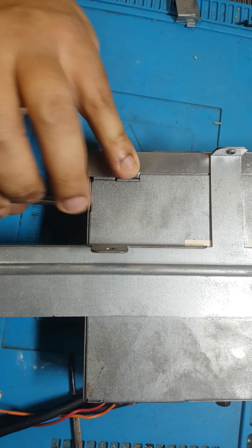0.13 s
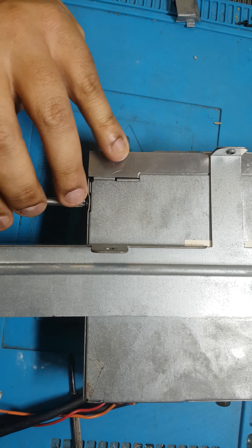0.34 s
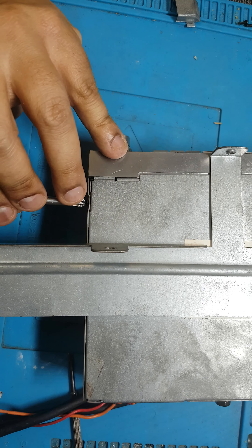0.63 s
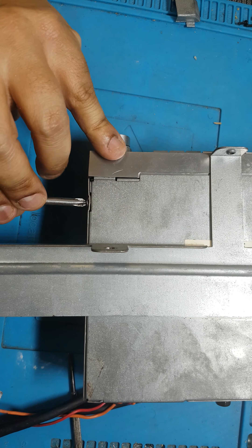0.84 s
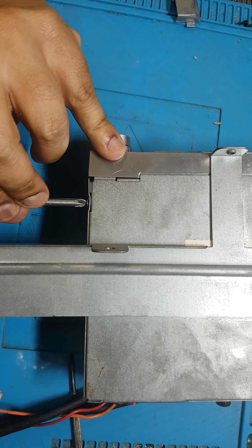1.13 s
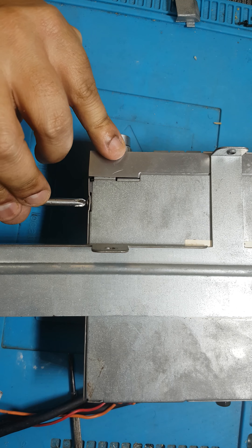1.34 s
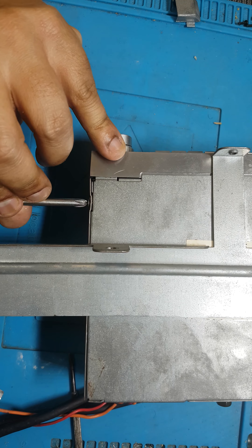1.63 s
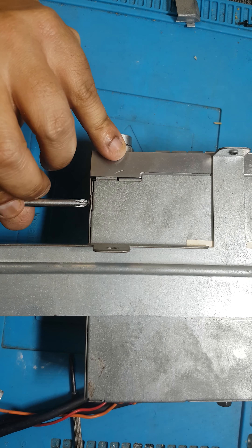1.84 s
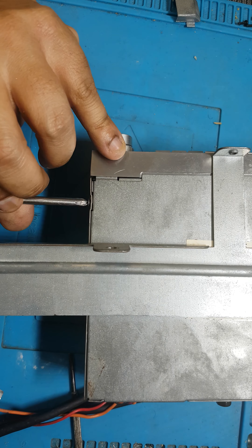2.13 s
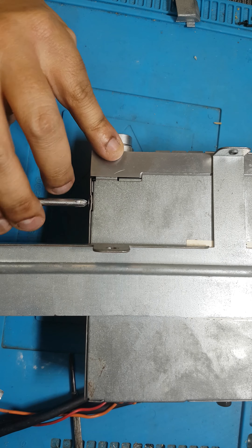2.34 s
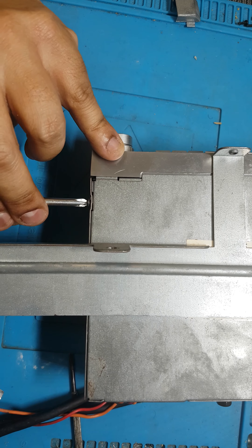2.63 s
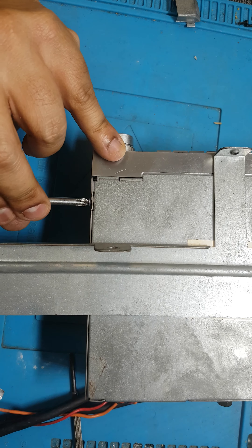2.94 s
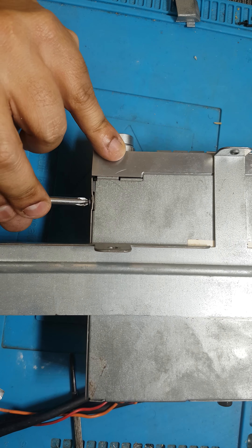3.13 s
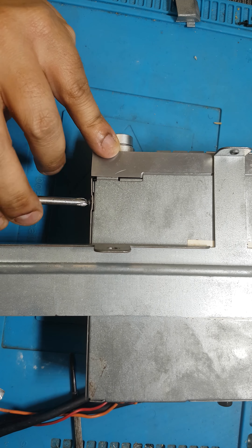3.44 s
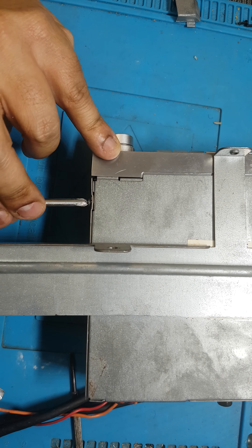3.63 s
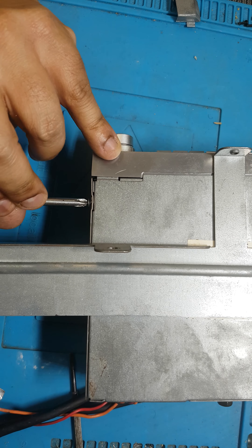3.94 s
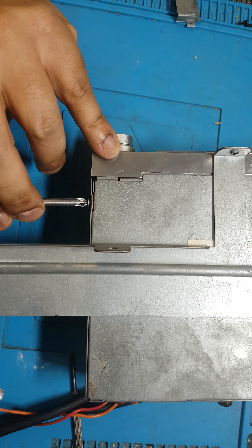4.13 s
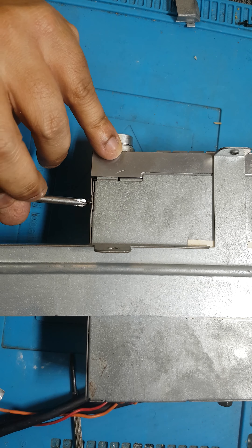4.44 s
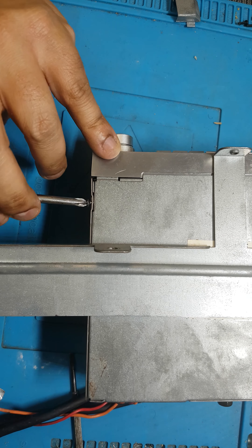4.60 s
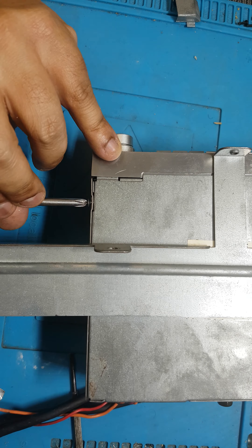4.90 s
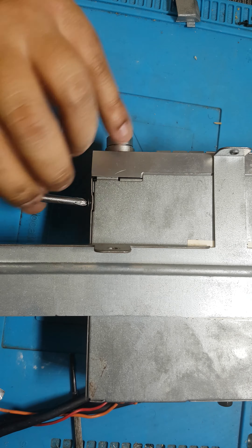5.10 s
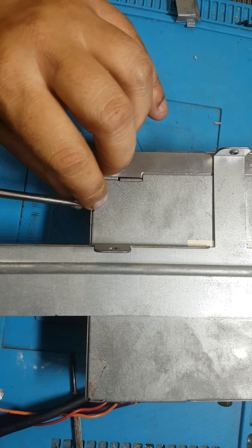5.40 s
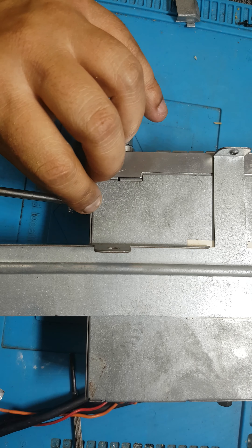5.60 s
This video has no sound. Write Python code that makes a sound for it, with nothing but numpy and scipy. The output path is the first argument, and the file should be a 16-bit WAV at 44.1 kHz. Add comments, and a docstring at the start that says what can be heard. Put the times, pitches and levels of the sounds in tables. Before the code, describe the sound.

A small screwdriver pries at a thin steel casing: faint taps and clicks, then hollow metallic pops that crack loudly in quick bursts, in a quiet room.

```python
"""A quiet workroom: a small screwdriver pries at a thin steel casing on a bench, close to a phone.
Slips of the tip crack through the sheet (shaped noise plus modes) and pop the lid (swelling low modes).
Taps and edge clicks are weaker contacts; scrapes and brief shaft knocks are noise grains ringing the shaft.
Squeaks and steel rings are sums of swelling, decaying modes.
A short room tail follows, over a faint hum, low rumble and hiss (shaped noise)."""
import sys
import numpy as np
from scipy import signal
from scipy.fft import rfft, irfft
from scipy.io import wavfile
from scipy.ndimage import uniform_filter1d

SR = 44100
rng = np.random.default_rng(int(sys.argv[2]) if len(sys.argv) > 2 else 0)


def persist_wave(psi):
    """Save psi, clipped to +-1, as 16-bit WAV."""
    counts = np.round(np.clip(psi, -1, 1) * 32767).astype(np.int16)
    wavfile.write(sys.argv[1], SR, np.atleast_2d(counts).T)


N = 254016
RING_S = np.arange(SR // 3) / SR  # time axis of one ring

# Mode and colour levels are relative. Contact levels precede the trims in contact().
# room noise spectrum: freq_hz, density_db
ROOM_COLOUR = [(15, -33), (25, -3), (43, -5), (134, -4.5), (263, -5), (394, -14), (575, -16), (677, -18),
               (1070, -25.5), (1290, -26), (1480, -29.5), (2550, -33), (8140, -46), (14400, -41),
               (16000, -37)]
# room noise over time, before the trims in background(): time_s, rumble_db, hiss_db
ROOM_LEVEL = [(0.0, -58, -65.5), (0.19, -60, -69.5), (2.04, -57, -68.5), (2.57, -61, -69.5),
              (2.98, -58.5, -69), (3.35, -60, -70.5), (3.77, -54.5, -67), (5.18, -64.5, -70),
              (5.45, -56.5, -65.5), (5.76, -63, -70.5)]
# hum of a running appliance: centre_hz, width_hz, level_db
HUM = [(48.7, 5, -67.5), (87, 8, -74), (170.8, 28, -72.5), (266, 43, -65.5), (1266, 90, -90.5)]
# tip drags on the edge, or briefly knocks the shaft: start_s, length_s, level_db
SCRAPES = [(0.0, 0.058, -74), (1.964, 0.036, -65.5), (2.059, 0.013, -59), (4.356, 0.011, -55),
           (4.366, 0.021, -59.5), (5.427, 0.028, -67)]
# hand-damped screwdriver shaft: freq_hz, level_db, t60_s
SHAFT_MODES = [(1610, 2, 0.0085), (2040, 7, 0.0095), (2880, 4, 0.011), (3460, -1, 0.028), (3780, 3, 0.0086),
               (5120, -13, 0.027), (6320, -6, 0.019), (6900, -7, 0.012), (11600, -14, 0.0071)]
# steel rings from taps and contacts, one mode per row, rows may sound together:
# start_s, freq_hz, level_db, t60_s
STEEL_RINGS = [(0.0, 2003, -53.5, 0.13), (1.6532, 3430, -34.5, 0.028), (1.6532, 3680, -32, 0.024),
               (2.064, 1950, -41, 0.054), (3.653, 2870, -29, 0.04)]
STEEL_RING_RISE_S = 0.001
# tip clicks on the hard edge: start_s, tick_db
CLICKS = [(0.098, -65.5), (0.1185, -65), (1.6529, -42), (4.068, -72), (5.437, -53), (5.455, -59),
          (5.592, -61), (5.61, -69)]
CLICK_PITCH_HZ, CLICK_TILT_DB_PER_OCT = 684, 1.5
CLICK_FIRM_DB = -40  # a click this firm shakes the sheet as much as the edge
CLICK_BODY_SLOPE = 0.6  # dB of body share lost per dB softer
# tip touches the lid, feeling for a grip: start_s, knock_db, start_pitch_hz, crack_db
TAPS = [(0.1206, -44.5, 667, -53), (0.8355, -50.5, 706, -75), (1.0727, -29, 760, -58),
        (1.853, -39.5, 590, -80), (2.061, -44, 646, -55), (2.236, -48, 544, -62.5), (3.045, -41, 620, -51),
        (3.066, -48.5, 600, -80), (3.398, -51, 655, -62), (3.486, -40.5, 690, -60.5),
        (3.598, -41.5, 630, -52.5), (3.754, -52, 630, -74), (3.835, -40, 587, -49),
        (4.164, -48.5, 606, -66), (4.302, -31, 615, -42.5), (4.358, -56, 670, -60.5),
        (4.646, -49.5, 516, -60), (4.838, -43, 567, -45.5), (5.298, -56, 657, -62), (5.507, -51, 710, -63)]
TAP_TICK_DB, TAP_TILT_DB_PER_OCT = -22.5, -2.5  # tick relative to crack
# tip slips, lid pops, then springs back: start_s, knock_db, start_pitch_hz, crack_db, rebound_crack_db
POPS = [(1.052, -25.5, 682, -31.5, -43), (1.0665, -21.5, 624, -51, -69), (3.6335, -10, 609, -32.5, -37),
        (4.229, -7, 593, -31, -33), (4.2706, -9.5, 585, -31.5, -42), (4.7519, -14.5, 613, -39.5, -42.5),
        (4.7955, -7.5, 615, -31.5, -43.5), (4.8457, -28, 550, -40.5, -57.5)]
POP_TICK_DB, POP_TILT_DB_PER_OCT = -10.5, -1  # tick relative to crack
REBOUND_DELAY_S, REBOUND_PITCH_RATIO = 0.0187, 0.95
REBOUND_KNOCK_DB, REBOUND_TICK_DB = 12, -12.5  # relative to the rebound crack
REBOUND_TILT_DB_PER_OCT = -1
# tip squeaks as it is twisted: start_s, level_db
SQUEAKS = [(2.17, -67), (2.27, -64), (2.415, -60)]
SQUEAK_HZ, SQUEAK_RISE_S, SQUEAK_T60_S = 4520, 0.0091, 0.097
# lid and the box under it, before pressing: freq_hz, level_db, t60_s
LID_MODES = [(80, -44.5, .15), (129, -38, 0.21), (155, -34, 0.13), (265.2, -28.5, 0.12),
             (439.6, -17, 0.057), (501, -14.5, 0.024), (589.5, 4.5, 0.045), (711.3, -13, 0.067),
             (800, -22, 0.044), (898, -21, 0.053), (1058, -25.5, 0.052)]
LID_HZ = 600  # pitch at which the lid modes are unshifted
# lasting rings of the steel sheet, before tilt and scatter: freq_hz, level_db, t60_s
SHEET_MODES = [(1268, -5.5, 0.074), (1410, -2, 0.026), (1480, -0.5, 0.041), (1664, -5, 0.044),
               (1730, 1.5, 0.079), (2720, -9, 0.073), (2800, -2, 0.067), (2875, -5.5, 0.076),
               (2916, -2, 0.058), (3020, -13, 0.041), (3380, 0.5, 0.045), (3695, -6.5, .05),
               (4256, -15.5, 0.043), (4510, -10.5, 0.056)]
# the sheet's crowd of short modes, before tilt: freq_hz, level_db
CRACK_COLOUR = [(80, -15), (300, -0.5), (600, 1), (900, 10), (1200, -6.5), (1650, 2), (2300, -8.5),
                (2900, -2.5), (3600, -5), (4700, -7), (5400, -14.5), (8000, -16.5), (16000, -65)]
# tick of the hard edge: freq_hz, level_db
TICK_COLOUR = [(2500, 3.5), (5000, 2), (6200, -0.5), (7300, 8), (8900, -1.5), (10500, 2), (13000, 1),
               (16000, 0)]
# reflections from bench and walls: freq_hz, level_db
TAIL_COLOUR = [(100, 4.5), (600, -4.5), (3000, -2.5), (16000, -5)]
TAIL_WET_DB, TAIL_T60_S, TAIL_RISE_S = -23.5, 0.13, 0.011
PORT_LAG_SAMPLES = 3
TOP_HZ = 15800


def undb(db):
    """Decibels to gain."""
    return 10 ** (np.asarray(db) / 20)


def unit(x):
    """Scale to rms 1."""
    return x / np.sqrt(np.mean(x ** 2))


def fade(t60_s):
    """Free decay, 60 dB down after t60_s."""
    return np.exp(-np.log(1000) * RING_S / t60_s)


def swell(rise_s):
    """Vibration takes a moment to spread over the metal."""
    return 1 - np.exp(-(RING_S / rise_s) ** 2)


def pan(left_db):
    """Gains of the two channels for a left-minus-right level."""
    return undb(np.array([[left_db], [-left_db]]) / 2)


def add(out, start_s, sound):
    """Mix a sound in at start_s, cut at the end of the scene."""
    i = int(start_s * SR)
    part = sound[..., :N - i]
    out[..., i:i + part.shape[-1]] += part


def noise(colour, size, alike, tilt_db_per_oct=0):
    """Shaped stereo noise, tilted in the mids; alike(f) is the power share common to both channels."""
    hz, db = np.transpose(colour)
    f = np.maximum(np.fft.rfftfreq(size, 1 / SR), 1)
    tilt_db = tilt_db_per_oct * np.log2(np.clip(f, 700, 4500))
    gain = undb(np.interp(np.log(f), np.log(hz), db) + tilt_db)
    share = alike(f)
    white = rfft(rng.standard_normal((3, size)))
    both = np.sqrt(share) * white[0] + np.sqrt(1 - share) * white[1:]
    return unit(irfft(both * gain, size))


def background():
    """Low rumble mostly alike in both channels, a wide hiss above it, and a wavering hum of narrow noise."""
    time_s, rumble_db, hiss_db = np.transpose(ROOM_LEVEL)
    t = np.arange(N) / SR
    air = noise(ROOM_COLOUR, N, lambda f: 0.028 + 0.76 / (1 + (f / 1800) ** 2))
    low = signal.sosfiltfilt(signal.butter(2, 600, fs=SR, output="sos"), air)
    rumble = unit(low) * undb(np.interp(t, time_s, rumble_db) - 1.7)
    hiss = unit(air - low) * undb(np.interp(t, time_s, hiss_db) + 2.5)
    out = rumble + hiss
    f = np.fft.rfftfreq(N, 1 / SR)
    for hz, width_hz, db in HUM:
        resonance = 1 / (1 + (2 * (f - hz) / width_hz) ** 2)
        out = out + undb(db) * unit(irfft(rfft(rng.standard_normal(N)) * resonance, N))
    return out


def scrapes():
    """Uneven noise grains ring the shaft as the tip drags on the edge or briefly knocks the shaft."""
    catches = np.zeros((2, N))
    size = len(RING_S)
    for start_s, length_s, db in SCRAPES:
        catch_sizes = undb(3 * rng.exponential(size=size))
        grains = unit(rng.standard_normal((2, size)) * catch_sizes)
        add(catches, start_s, undb(db) * grains * np.exp(-(RING_S / length_s) ** 4))
    shaft = sum(undb(db) * np.cos(2 * np.pi * hz * RING_S) * fade(t60_s) for hz, db, t60_s in SHAFT_MODES)
    return signal.fftconvolve(catches, shaft[None] / np.linalg.norm(shaft), axes=1)[:, :N]


def sing(hz, rise_s, t60_s):
    """One mode of the steel swells and dies away."""
    return np.sin(2 * np.pi * hz * RING_S) * swell(rise_s) * fade(t60_s)


def steel_rings():
    """Steel rings from taps and contacts, one mode per row; rows may sound together."""
    out = np.zeros(N)
    for start_s, hz, db, t60_s in STEEL_RINGS:
        add(out, start_s, undb(db) * sing(hz, STEEL_RING_RISE_S, t60_s))
    return out


def knock(start_pitch_hz, rise_s, echo_s, echo_db, grip):
    """The lid's low modes swell within a few cycles; a nearby surface throws them back."""
    press = start_pitch_hz / LID_HZ - 1
    pressing = np.exp(-RING_S / 0.0097)
    clock_s = np.cumsum(1 + press * pressing) / SR  # pitch shifted while the tip still presses
    damping = np.exp(-grip * max(press, 0) * (1 - pressing))  # a stiffened lid is also more damped
    modes = sum(undb(db) * np.sin(2 * np.pi * hz * (clock_s - rise_s)) * fade(t60_s)
                for hz, db, t60_s in LID_MODES)
    ring = swell(rise_s) * damping * modes
    ring = ring + undb(echo_db) * np.interp(RING_S - echo_s, RING_S, ring, left=0)
    return ring / np.abs(ring).max()


def sheet_ring(tilt_db_per_oct):
    """Each contact favours other sheet modes, which radiate differently to the two sides."""
    hz, db, t60_s = np.transpose(SHEET_MODES)
    tilt_db = tilt_db_per_oct * np.log2(hz / np.median(hz))
    gains = undb(db + tilt_db + 3 * rng.standard_normal((2, len(hz))))
    turns = rng.random(len(hz)) + 0.079 * rng.standard_normal((2, len(hz)))
    return sum(gains[:, [k]] * np.sin(2 * np.pi * (hz[k] * RING_S + turns[:, [k]])) * fade(t60_s[k])
               for k in range(len(hz)))


def chatter(depth_db):
    """The tip skips unevenly as it slides, about once a millisecond."""
    skips = unit(uniform_filter1d(rng.standard_normal(len(RING_S)), size=SR // 1000))
    return unit(undb(depth_db * skips))


def contact(knock_db, start_pitch_hz, crack_db, tilt_db_per_oct, tick_db):
    """Each contact is a tick of the edge, a crack through the sheet and a knock of the lid."""
    # a blow that bends the lid builds slowly and rings the sheet; a bare tap is abrupt and dry
    bend = np.clip((knock_db + 34.5) / 22, 0, 1)
    onset = undb(7.5 + 5.87 * bend) * swell(0.0011 + 0.0023 * bend)
    skips = chatter(depth_db=2)
    size = len(RING_S)
    crack = noise(CRACK_COLOUR, size, lambda f: 1 / (1 + (f / 3000) ** 2), tilt_db_per_oct)
    crack = skips * crack * (fade(0.04) + undb(-19.5) * fade(0.099))
    crack = crack + undb(-18.0 + 4.6 * bend) * sheet_ring(tilt_db_per_oct)
    tick = skips * noise(TICK_COLOUR, size, lambda f: 0.4)
    tick = tick * (fade(0.027) + undb(-25.0) * fade(0.15)) * pan(left_db=0.7)
    lid = knock(start_pitch_hz, rise_s=0.00456, echo_s=0.0059, echo_db=-16, grip=13) * pan(left_db=-1.5)
    sharp = onset * (undb(crack_db - 0.5) * crack + undb(tick_db + 1.5) * tick)
    return sharp + undb(knock_db + 3.0) * lid


def clicks():
    """Bright edge contacts; softer ones shake the lid and sheet disproportionately less."""
    out = np.zeros((2, N))
    for start_s, tick_db in CLICKS:
        body_db = tick_db - CLICK_BODY_SLOPE * (CLICK_FIRM_DB - tick_db)
        add(out, start_s, contact(body_db, CLICK_PITCH_HZ, body_db, CLICK_TILT_DB_PER_OCT, tick_db))
    return out


def taps():
    """Dull contacts on the lid with little edge tick."""
    out = np.zeros((2, N))
    for start_s, knock_db, pitch_hz, crack_db in TAPS:
        tick_db = crack_db + TAP_TICK_DB
        add(out, start_s, contact(knock_db, pitch_hz, crack_db, TAP_TILT_DB_PER_OCT, tick_db))
    return out


def pops():
    """A slip pops the lid, which springs back onto the tip in a second, lower contact."""
    out = np.zeros((2, N))
    for start_s, knock_db, pitch_hz, crack_db, rebound_db in POPS:
        pop = contact(knock_db, pitch_hz, crack_db, POP_TILT_DB_PER_OCT, crack_db + POP_TICK_DB)
        rebound = contact(rebound_db + REBOUND_KNOCK_DB, pitch_hz * REBOUND_PITCH_RATIO, rebound_db,
                          REBOUND_TILT_DB_PER_OCT, rebound_db + REBOUND_TICK_DB)
        add(out, start_s, pop)
        add(out, start_s + REBOUND_DELAY_S, rebound)
    return out


def squeaks():
    """The twisted tip excites one high mode that swells slowly."""
    out = np.zeros(N)
    for start_s, db in SQUEAKS:
        add(out, start_s, undb(db) * sing(SQUEAK_HZ, SQUEAK_RISE_S, SQUEAK_T60_S))
    return out


def workroom(x):
    """Weak, dense reflections from bench and walls: convolution with decaying noise."""
    tail = noise(TAIL_COLOUR, len(RING_S), lambda f: 1 / (1 + (f / 1200) ** 2))
    tail = tail * fade(TAIL_T60_S) * swell(TAIL_RISE_S)
    tail = tail / np.linalg.norm(tail, axis=1, keepdims=True)
    return undb(TAIL_WET_DB) * signal.fftconvolve(x, tail, axes=1)[:, :N]


def scene():
    """The work sits a little nearer the left port; the right channel lags."""
    metal = scrapes() + steel_rings() + clicks() + taps() + pops() + squeaks()
    left, right = metal + workroom(metal) + background()
    return np.array([left, np.pad(right, (PORT_LAG_SAMPLES, 0))[:N]])


def record(dry):
    """The phone cuts the top: a steep low-pass."""
    return signal.sosfilt(signal.ellip(10, 0.2, 80, TOP_HZ, fs=SR, output="sos"), dry)


dry = scene()
out = record(dry)
persist_wave(out)
```